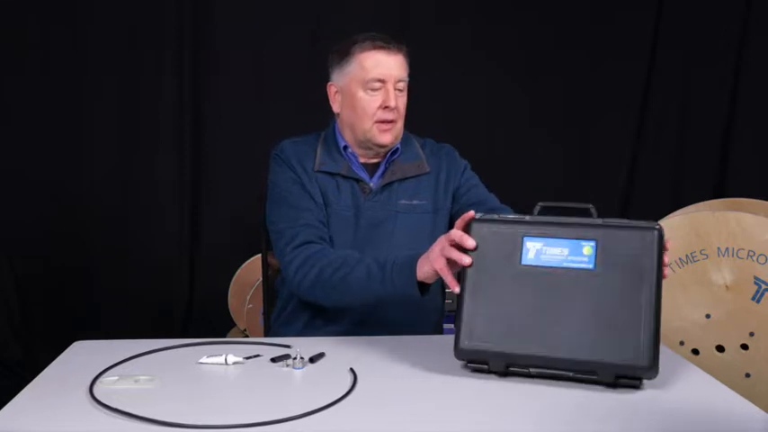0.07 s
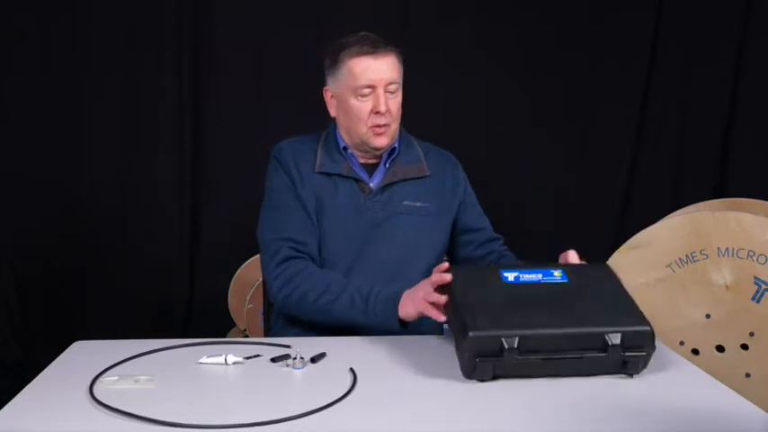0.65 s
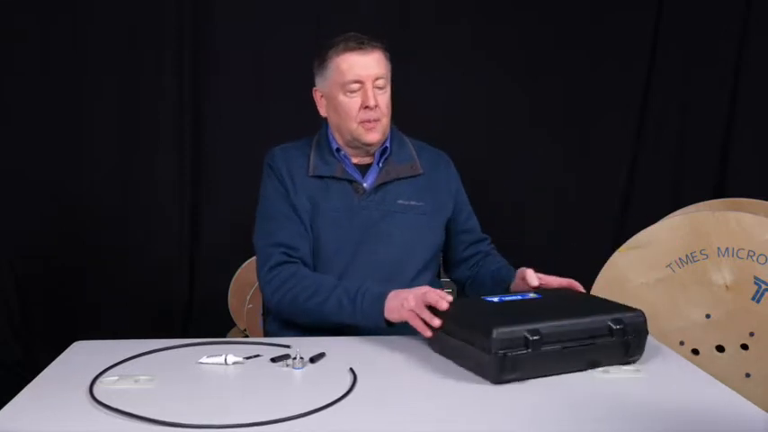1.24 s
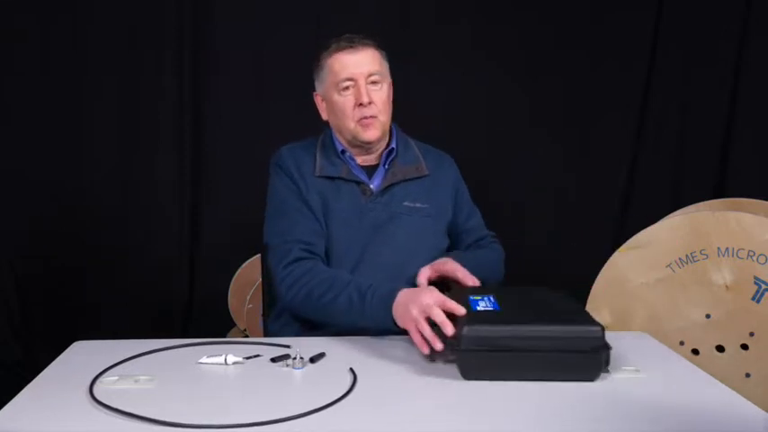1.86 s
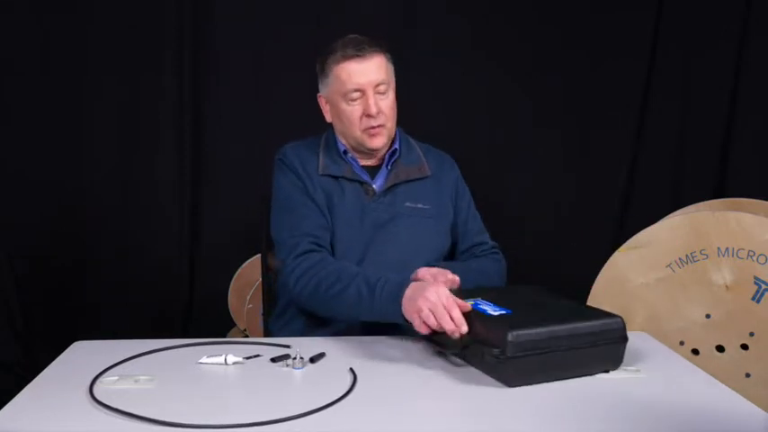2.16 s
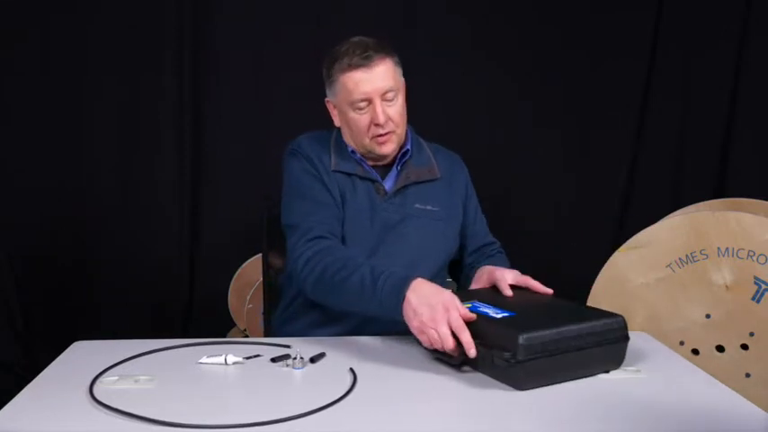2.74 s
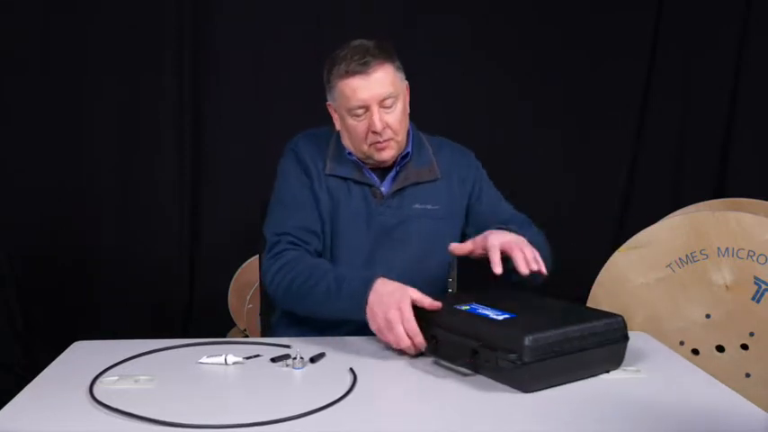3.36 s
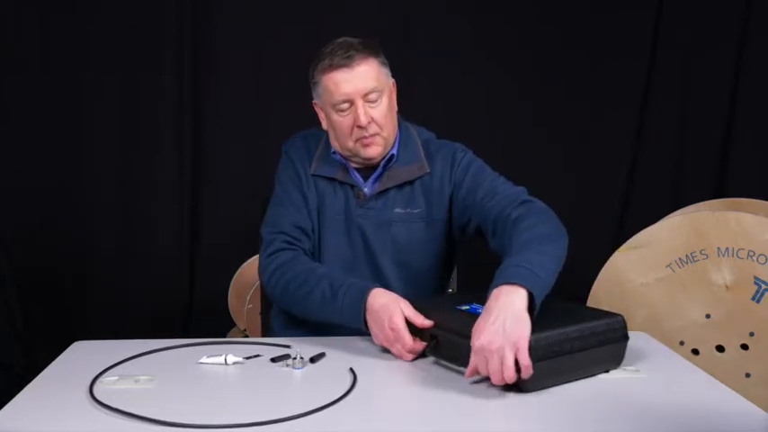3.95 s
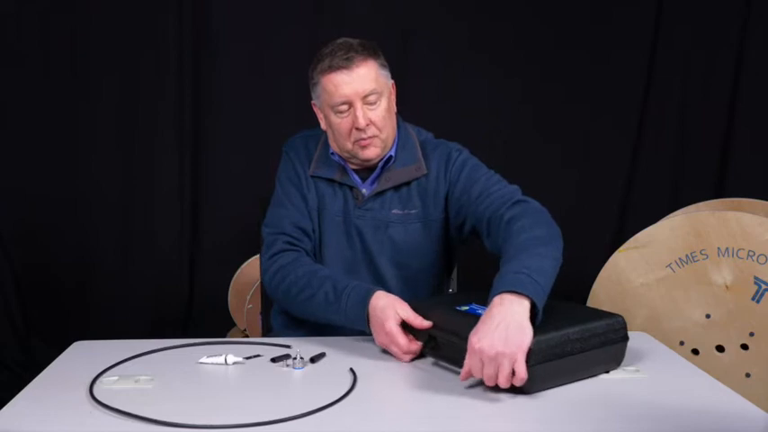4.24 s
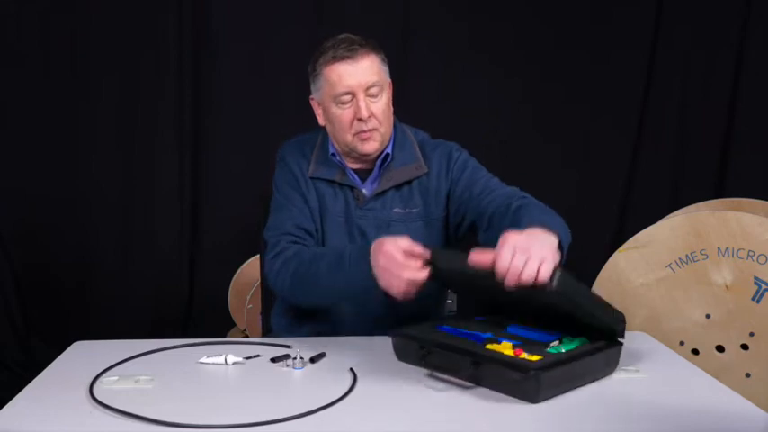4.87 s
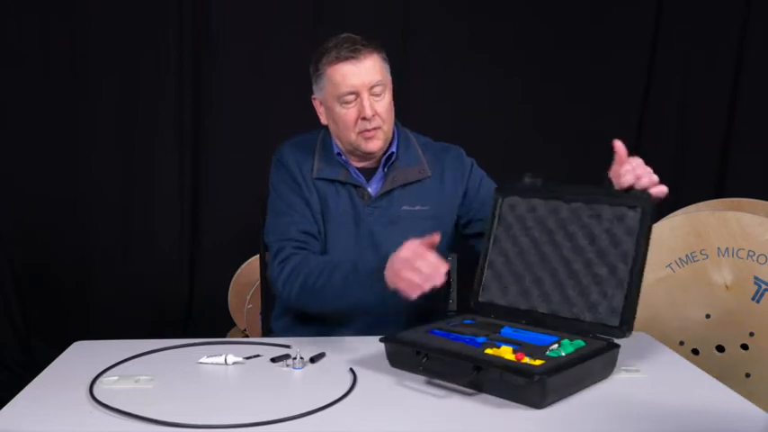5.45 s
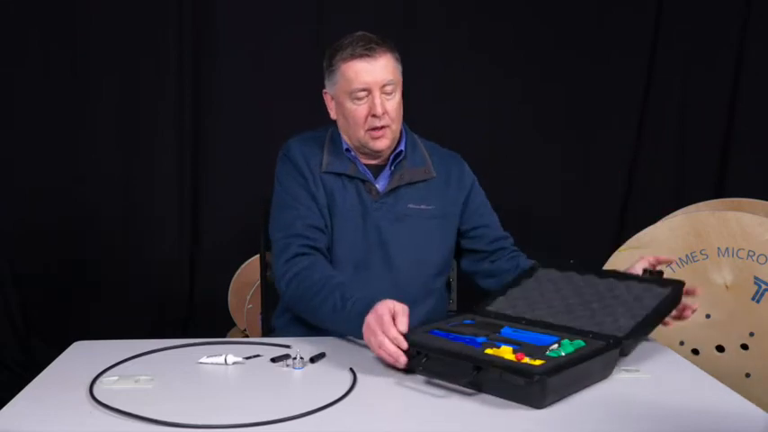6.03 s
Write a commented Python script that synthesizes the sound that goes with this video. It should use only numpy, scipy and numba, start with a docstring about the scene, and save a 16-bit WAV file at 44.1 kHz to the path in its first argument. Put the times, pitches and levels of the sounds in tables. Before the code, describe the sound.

A hard plastic case thuds onto a table and scrapes around, then its latches snap open sharply and the lid lifts with small clicks.

```python
"""Close up, sleeves rustle and a hard plastic tool case tips over, then drops flat on a table, its hollow shell
ringing. It is dragged round, feet scraping in tiny slips, and hands and handle knock against it. From 4.2 s the
catches snap open, ringing the rim, and slap back. The lid swings up with a rub near 4.9 s and meets its stop.
Small sharp clicks and ticks follow and the lid's fittings ring. All along, ventilation rumbles, a small damped
room answers, and a gain control ducks after the loudest blows."""
import sys
import numpy as np
from scipy import signal
from scipy.fft import rfft, irfft
from scipy.io import wavfile
from scipy.ndimage import map_coordinates
from numba import njit

SR = 44100
rng = np.random.default_rng(int(sys.argv[2]) if len(sys.argv) > 2 else 0)


def wav_out(sig):
    """Save sig, one row per channel (or a flat mono array), as 16-bit PCM at SR to the path in sys.argv[1]."""
    wavfile.write(sys.argv[1], SR, np.round(np.clip(np.atleast_2d(sig).T, -1, 1) * 32767).astype(np.int16))


N = 268833
TOP_HZ, HIT_SAMPLES = 16000, 22050
TIME = np.arange(N) / SR
AGE = TIME[:HIT_SAMPLES]  # seconds since a hit


def undb(db):
    """Decibels to gain."""
    return 10 ** (np.asarray(db) / 20)


def unit(x):
    """Scale to rms 1."""
    return x / np.sqrt(np.mean(x ** 2))


def burst(x, db):
    """Give a short sound the energy of 20 ms at this level."""
    return x * undb(db) / np.sqrt(np.sum(x ** 2) / (.02 * SR))


def fade(t60):
    """Exponential decay, 60 dB down after t60 seconds."""
    return np.exp(-np.log(1000) * AGE / t60)


def mode(hz, t60):
    """One struck resonance dying away."""
    return fade(t60) * np.sin(2 * np.pi * hz * AGE)


def colour(x, points):
    """Minimum-phase EQ through (f/Hz, level/dB) points."""
    hz, db = np.transpose(points)
    grid = np.linspace(1, SR / 2, 2049)
    cepstrum = irfft(np.log(undb(np.interp(np.log(grid), np.log(hz), db))))
    half = len(cepstrum) // 2
    cepstrum[1:half] *= 2
    cepstrum[half + 1:] = 0
    return signal.fftconvolve(x, irfft(np.exp(rfft(cepstrum))))[:len(x)]


def resonate(x, hz, q):
    """Resonant band-pass, gain 1 at its centre."""
    return signal.lfilter(*signal.iirpeak(min(hz, TOP_HZ), max(q, hz / TOP_HZ * 2), fs=SR), x)


def wander(rate):
    """Smooth random drift with a spread near 1."""
    return map_coordinates(rng.standard_normal(4096), [TIME * rate], order=2, mode="wrap")


def grains(rate, spread_db):
    """Random tiny slips, rate per second, most weak and a few strong."""
    chance, size, sign = rng.random(N), rng.exponential(size=N), rng.standard_normal(N)
    return unit((chance < rate / SR) * np.sign(sign) * undb(spread_db * np.minimum(size, 5)))


def chatter(t60, rise):
    """A noise burst that swells quickly and dies, as when touching faces chatter."""
    return np.sign(rng.standard_normal(HIT_SAMPLES)) * fade(t60) * (1 - np.exp(-AGE / rise))


def gesture(t, rise, fall):
    """Swell of a hand movement: fastest at t, 21 dB down one rise earlier and one fall later."""
    away = np.maximum((t - TIME) / rise, (TIME - t) / fall)
    return undb(-21 * np.minimum(away, 4) ** 1.6)


def mix(cues):
    """Lay (t/s, sound) cues on one track."""
    track = np.zeros(N)
    for t, sound in cues:
        start = int(t * SR)
        track[start:start + len(sound)] += sound[:N - start]
    return track


# EQ of the room's air: f/Hz, level/dB
AIR_EQ = [(12, -36), (20, 0), (79, -10.5), (127, -14), (210, -16), (527, -18.5), (802, -25), (5380, -37.5),
          (16000, -49.5)]

def room_tone():
    """A bed of ventilation rumble and smooth hiss, with a wavering low hum."""
    hum = unit(resonate(resonate(rng.standard_normal(N), 82.8, q=8.9), 82.8, q=8.9))
    air = unit(colour(rng.standard_normal(N), AIR_EQ))
    return undb(-46) * air + undb(-60) * hum


# modes of the hollow shell: f/Hz, level/dB, t60/s
SHELL_MODES = [(127, -12.5, 0.11), (219, 0.5, 0.076), (253, 1.5, 0.061), (315.6, 4, 0.031), (428, -5, 0.11),
               (523, -9, 0.072), (680, -12, 0.058), (741, -9.5, 0.042), (1052, -13.5, 0.087),
               (1430, -23, 0.063)]
# EQ of feet on the table top: f/Hz, level/dB
SCRAPE_EQ = [(110, -32.5), (160, -5.5), (205, 5), (290, -4.5), (410, -2), (560, -5.5), (675, -4),
             (810, -14), (1550, -19.5), (2100, -18.5), (2900, -46), (5000, -43.5)]
# an edge grates as the case tips and turns: t/s, rise and fall/s, level/dB
EDGE_GRATES = [(0.29, 0.21, -43), (1.23, 0.28, -49.5), (1.66, 0.26, -45)]
# pushes on the case, the last as the lid lifts: t/s, rise/s, fall/s, scrape level/dB, rustle gain/dB
CASE_PUSHES = [(0.31, 0.55, 0.39, -40.5, -58), (0.9, 0.17, 0.29, -45.5, -56.5),
               (1.65, 0.5, 0.36, -34.5, -49), (2.179, 0.25, 0.28, -36, -53), (4.77, 0.074, 0.1, -33, -49.5)]

def drag():
    """The feet slip in fine grains that ring the shell and the broad lid panel; an edge grates higher."""
    slips = grains(rate=4500, spread_db=1.8) * undb(wander(30))
    feet = unit(colour(slips, SCRAPE_EQ))
    shell = unit(sum(undb(db) * resonate(slips, hz, q=90) for hz, db, _ in SHELL_MODES))
    panel = unit(resonate(slips, 136, q=3.1))
    scrape = unit(feet + undb(-14.5) * shell + undb(-16.5) * panel)
    edge = unit(resonate(resonate(slips, 1530, q=1.2), 1530, q=1.2))
    pushing = sum(undb(db) * gesture(t, rise, fall) for t, rise, fall, db, _ in CASE_PUSHES)
    grating = sum(undb(db) * gesture(t, width, width) for t, width, db in EDGE_GRATES)
    return scrape * pushing + edge * grating


LID_LIFT = gesture(4.91, rise=0.2, fall=0.19)  # drives both the rustle and the lid's rub
# EQs of crisp sleeve cloth, an airy brush on the chest and dull rubbed plastic: f/Hz, level/dB
SLEEVE_EQ = [(1500, 2), (3000, -3.5), (4500, -0.5), (6500, 0.5), (8500, -9.5), (12000, -14.5), (16000, -35)]
BRUSH_EQ = [(2000, -0.5), (6000, -12.5), (10000, -8), (16000, -12)]
RUB_EQ = [(100, -21), (210, 5), (320, 1.5), (520, 1), (850, -5), (1500, -8.5), (2200, -11.5), (2800, -20),
          (6000, -18), (8000, -50)]
# changes of grip: t/s, rise and fall/s, rustle gain/dB
GRIP_CHANGES = [(0.58, 0.44, -58), (1.87, 0.1, -54.5), (2.66, 0.48, -60.5), (2.957, 0.013, -57.5),
                (3.07, 0.082, -58), (3.221, 0.064, -53.5), (3.38, 0.16, -53.5), (3.72, 0.28, -56)]
# the arm brushes the chest, reaching over and back: t/s, rise/s, fall/s, level/dB
CHEST_BRUSHES = [(0.5, 0.5, 0.43, -58.5), (3.66, 0.21, 0.31, -51), (4.85, 0.16, 0.14, -56)]

def rustle():
    """Cloth fibres catch and let go with every arm movement; fingers scratch and fumble on the shell."""
    sleeve = unit(colour(grains(rate=7000, spread_db=0), SLEEVE_EQ)) * undb(-1.5 + wander(40))
    scratch = unit(colour(grains(rate=1300, spread_db=3) * undb(3.5 * wander(30)), SLEEVE_EQ))
    fumble = unit(colour(grains(rate=190, spread_db=1.5), RUB_EQ)) * undb(2 * wander(9.8))
    brush = unit(colour(rng.standard_normal(N), BRUSH_EQ))
    pushing = sum(undb(db) * gesture(t, rise, fall) for t, rise, fall, _, db in CASE_PUSHES)
    gripping = sum(undb(db) * gesture(t, width, width) for t, width, db in GRIP_CHANGES)
    reaching = sum(undb(db) * gesture(t, rise, fall) for t, rise, fall, db in CHEST_BRUSHES)
    arms = pushing + gripping + undb(-44.5) * LID_LIFT
    return arms * (sleeve + undb(-0.5) * scratch + undb(6.5) * fumble) + reaching * brush


# EQs of the struck part's clack and the hard contact's crack: f/Hz, level/dB
CLACK_EQ = [(150, -23), (400, 4.5), (900, 1), (1500, -2.5), (2300, -2.5), (2900, -11), (6000, -17)]
CRACK_EQ = [(500, -3), (2800, -4), (4000, -3), (5200, -7.5), (6600, -8), (7600, -16), (11000, -24.5),
            (16000, -30)]

def blow(db, clack_hz, thud_db, crack_db):
    """The struck part clacks at db; the shell's thud and a bright crack are set relative to that."""
    # where the blow lands shifts the balance of the modes; each is also slightly detuned
    scatter = rng.standard_normal((len(SHELL_MODES), 2))
    thud = sum((-1) ** k * undb(mode_db + 1.25 * drive) * mode(hz * (1 + 0.0064 * detune), t60)
               for k, ((hz, mode_db, t60), (drive, detune)) in enumerate(zip(SHELL_MODES, scatter)))
    impact = burst(signal.unit_impulse(HIT_SAMPLES), 0) + burst(chatter(t60=.024, rise=.0005), 2)
    clack = resonate(colour(impact, CLACK_EQ), clack_hz, q=0.82)
    # the length of the contact leaves little above twice the clack's pitch
    clack = signal.sosfilt(signal.butter(4, 2 * clack_hz, fs=SR, output="sos"), clack)
    attack = chatter(t60=.009, rise=.0012)
    loose_parts = undb(-22.5) * chatter(t60=0.089, rise=0.0048)
    crack = colour(attack + loose_parts, CRACK_EQ)
    return burst(thud, db + thud_db) + burst(clack, db) + burst(crack, db + crack_db)


# knocks on the case, which drops flat at 0.9 s: t/s, level/dB, clack f/Hz, relative crack level/dB
CASE_KNOCKS = [(0.316, -37.5, 385, -31), (0.419, -39.5, 520, -10.5), (0.908, -21, 1290, -4),
               (0.9167, -31.5, 1290, 2), (0.982, -38.5, 1700, -5), (2.260, -33, 380, -10),
               (2.386, -44.5, 418, -4.5), (2.873, -46, 457, 3), (3.027, -45.5, 560, -3),
               (3.038, -39.5, 450, -14), (3.346, -32, 760, -11), (3.519, -55, 970, -19),
               (3.733, -40, 244, -36), (3.763, -37.5, 397, -33), (3.823, -42.5, 1250, -25),
               (3.855, -45.5, 615, -26), (4.02, -47, 330, -26), (4.108, -48, 620, -32),
               (4.258, -27.5, 450, -24), (4.327, -26.5, 604, -35), (5.824, -47.5, 724, -2)]

def knocks():
    """Table, hands and handle strike the case; harder contacts crack more."""
    return mix((t, blow(db, hz, thud_db=4.5, crack_db=crack_db)) for t, db, hz, crack_db in CASE_KNOCKS)


# small ticks and scuffs, the one at 5.04 s as the lid meets its stop and the last a light tick on the lid, plus
# a faint hissy room tail # after the sharp clicks: t/s, level/dB, f/Hz, t60/s
TICKS_AND_TAIL = [(0.516, -49.5, 1550, 0.091), (2.033, -43.5, 1510, 0.052), (2.481, -50, 1900, 0.02),
                  (2.874, -30.5, 700, 0.032), (2.876, -41.5, 7550, 0.021), (3.021, -54, 5800, 0.07),
                  (3.221, -57, 3470, 0.068), (4.22, -39.5, 4500, 0.054), (4.281, -32, 2170, 0.025),
                  (4.354, -51, 4200, 0.015), (4.705, -47, 4760, 0.052), (5.039, -44.5, 5100, 0.11),
                  (5.56, -56, 14000, 0.007), (5.6259, -29, 5180, 0.046), (5.628, -47.5, 11000, 0.15),
                  (5.636, -42, 7200, 0.12), (5.687, -46.5, 4200, 1), (5.7, -47.5, 7100, 0.0042),
                  (5.708, -47.5, 1200, 0.0084), (5.822, -43.5, 1950, 0.034), (5.822, -52.5, 8300, 0.018)]

def ticks_and_tail():
    """Noise bursts focused around one pitch each: short ones tick or scuff, the long one hisses away."""
    cues = []
    for t, db, hz, t60 in TICKS_AND_TAIL:
        band = resonate(chatter(t60, rise=0.0007), hz, q=4.3)
        cues.append((t, burst(resonate(band, hz, q=0.41), db)))
    return mix(cues)


# dull bumps through the case and table top: t/s, level/dB, f/Hz, t60/s
LOW_BUMPS = [(0.906, -32, 78, 0.28), (0.909, -22.5, 337, 0.049), (0.910, -28.5, 150, 0.06),
             (2.876, -37, 219, 0.15), (3.643, -35, 132, 0.018), (4.199, -23, 136, 0.079),
             (4.284, -31, 78.7, 0.5)]

def bumps():
    """Low resonances of case and table give the handling its weight."""
    return mix((t, burst(mode(hz, t60), db)) for t, db, hz, t60 in LOW_BUMPS)


# thin rings of the handle, then of the open lid's fittings: t/s, level/dB, f/Hz, t60/s
FITTING_PINGS = [(3.347, -41.5, 2560, 0.034), (3.348, -40.5, 1071, 0.067), (3.348, -43.5, 1367, 0.18),
                 (5.715, -54.5, 1890, 0.74), (5.715, -57, 2650, 0.5), (5.687, -62, 4400, 0.9)]

def pings():
    """Small parts are struck and ring on in pure tones."""
    return mix((t, burst(mode(hz, t60), db)) for t, db, hz, t60 in FITTING_PINGS)


def pitch_dive(first_hz, last_hz, glide, t60, rise):
    """A dying tone whose pitch drops within milliseconds."""
    hz = last_hz + (first_hz - last_hz) * np.exp(-AGE / glide)
    return fade(t60) * (1 - np.exp(-AGE / rise)) * np.sin(2 * np.pi * np.cumsum(hz) / SR)


# modes of the stiff rim that carries the catches: f/Hz, level/dB, t60/s
RIM_MODES = [(504, 5.5, 0.039), (800, 1, 0.05), (908, 0.5, 0.2), (1100, 4, 0.11), (1258, 0, 0.086),
             (1455, -0.5, 0.095), (1580, 5.5, 0.053), (2040, 0.5, 0.057)]

def rim(clack_hz):
    """The rim rings on after a snap, most in the modes near the clack's pitch."""
    ring = sum((-1) ** k * undb(db) * mode(hz, t60) for k, (hz, db, t60) in enumerate(RIM_MODES))
    return resonate(ring, clack_hz, q=2.2)


# catches letting go: t/s, level/dB, first f/Hz, last f/Hz, glide/s, t60/s, clack f/Hz,
# relative clack level/dB, relative rim level/dB, slap delay/s, slap level/dB
CATCH_SNAPS = [(4.1976, -15, 1164, 463, 0.0027, 0.044, 690, -5.5, -5, 0.0275, -27),
               (4.2808, -9.5, 2105, 206, 0.001413, 0.045, 1230, -7, -11.5, 0.023, -20.5),
               (4.544, -28, 2000, 410, 0.00196, 0.029, 1190, -3.5, -7, 0.027, -30)]

def latches():
    """A catch snaps free, bending the wall, ringing the rim and scuffing past its lip, then slaps back."""
    cues = []
    for t, db, first_hz, last_hz, glide, t60, clack_hz, clack_db, rim_db, delay, slap_db in CATCH_SNAPS:
        # a bending wave in the wall brings the treble first
        wall = burst(pitch_dive(first_hz, last_hz, glide, t60, rise=0.00074), db)
        ring = burst(rim(clack_hz), db + rim_db)
        clack = blow(db + clack_db, clack_hz, thud_db=-3, crack_db=-22)
        click = burst(resonate(chatter(t60=0.0084, rise=0.00087), 5770, q=11), db - 30.5)
        scuff = burst(resonate(chatter(t60=0.19, rise=0.001), 13000, q=2.3), db - 38.5)
        slap = blow(slap_db, clack_hz=890, thud_db=-1, crack_db=-11)
        cues += [(t, wall + ring + clack + click + scuff), (t + delay, slap)]
    return mix(cues)


def lid_rub():
    """The lid swings up on dense, even slips: a dull rub with a hollow middle."""
    slips = grains(rate=5000, spread_db=0.5)
    hollow = unit(resonate(slips, 510, q=3))
    rub = unit(unit(colour(slips, RUB_EQ)) + undb(-7.5) * hollow)
    return undb(-26.5) * rub * LID_LIFT


# small sharp clicks: t/s, level/dB, first f/Hz, last f/Hz, glide/s, t60/s
SHARP_CLICKS = [(5.6276, -37.5, 6480, 920, 0.00195, 0.059), (5.683, -32, 6300, 3310, 0.00048, 0.0036)]

def sharp_clicks():
    """Small sharp clicks that dive quickly in pitch."""
    return mix((t, burst(pitch_dive(first_hz, last_hz, glide, t60, rise=0.001), db))
               for t, db, first_hz, last_hz, glide, t60 in SHARP_CLICKS)


# bands of the damped room's tail: f/Hz, t60/s, level/dB
REVERB_BANDS = [(83.5, 0.17, -0.5), (217, 0.57, -7), (328, 0.49, -5.5), (570, 0.4, -7.5), (1220, 0.47, -10),
                (2780, 0.21, -9.5), (6100, 0.18, -19), (12000, 0.093, -20)]

def reverb(x):
    """Diffuse reflections build up over some milliseconds and die sooner in the treble."""
    hz, t60, db = np.transpose(REVERB_BANDS)
    grid = np.log(np.linspace(1, SR / 2, HIT_SAMPLES // 2 + 1))
    noise = rfft(rng.standard_normal(HIT_SAMPLES))
    tail = 0
    for share, decay, gain in zip(np.eye(len(hz)), t60, undb(db)):
        shape = fade(decay) * (1 - np.exp(-(AGE / 0.0064) ** 2))
        band = irfft(noise * np.interp(grid, np.log(hz), share))
        tail = tail + gain * band * shape / np.sqrt(np.sum(shape ** 2))
    return signal.fftconvolve(x, tail)[:N]


def scene():
    """Case, clicks and cloth sound into the same small room, in mono."""
    case = knocks() + latches() + bumps() + pings() + drag() + lid_rub()
    direct = case + ticks_and_tail() + sharp_clicks() + rustle()
    return (direct + reverb(direct) + room_tone())[None]


@njit
def follow(x, attack_s, release_s):
    """Envelope follower with separate rise and fall times."""
    out, level = np.empty(len(x)), 0.
    for i in range(len(x)):
        lag = attack_s if abs(x[i]) > level else release_s
        level += (abs(x[i]) - level) / (lag * SR)
        out[i] = level
    return out


def record(dry):
    """Gain control ducks after loud blows; peaks are clipped and the top is cut."""
    envelope = follow(dry[0], attack_s=0.016, release_s=0.3)
    threshold = undb(-28.5)
    gain = np.minimum(1, threshold / (envelope + 1e-9)) ** 0.22
    high_cut = signal.ellip(10, .2, 70, TOP_HZ, fs=SR, output="sos")
    return signal.sosfilt(high_cut, np.clip(dry * gain, -1, 1))


dry = scene()
out = record(dry)
wav_out(out)
```